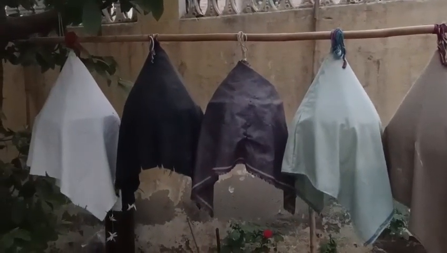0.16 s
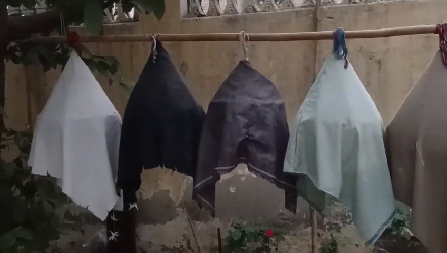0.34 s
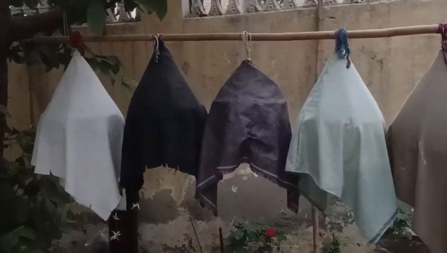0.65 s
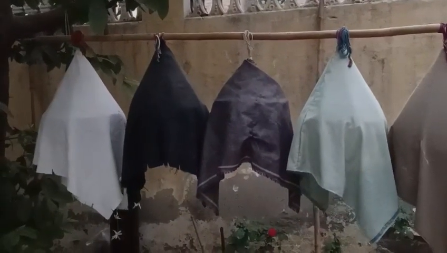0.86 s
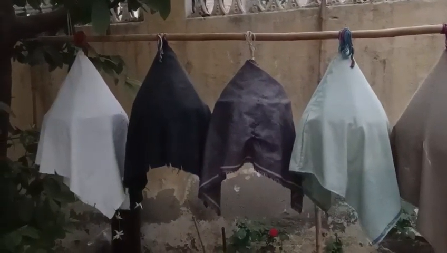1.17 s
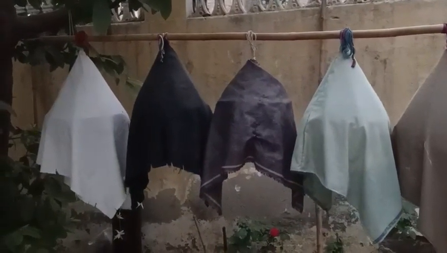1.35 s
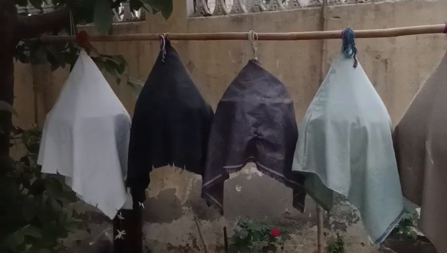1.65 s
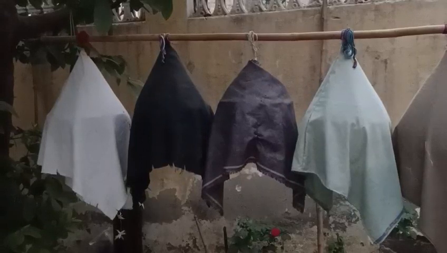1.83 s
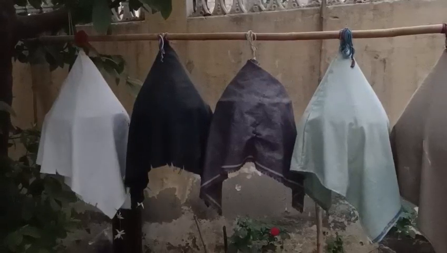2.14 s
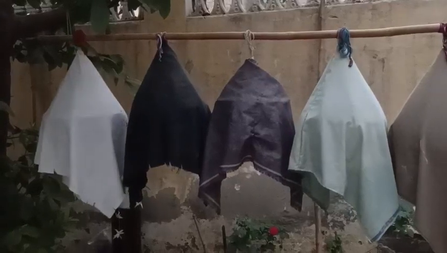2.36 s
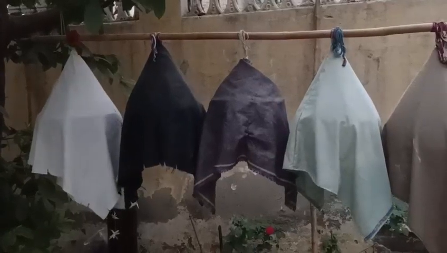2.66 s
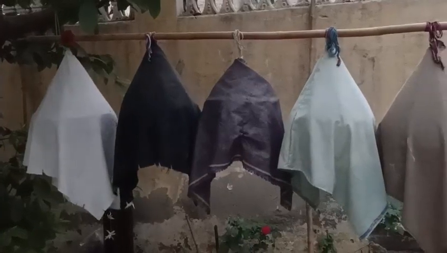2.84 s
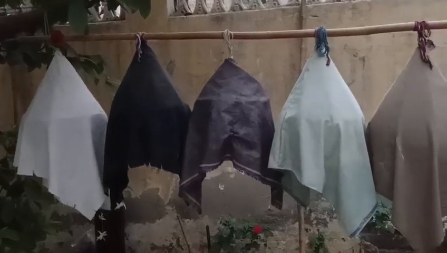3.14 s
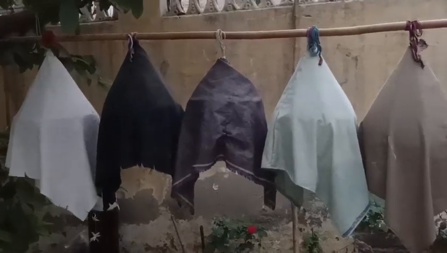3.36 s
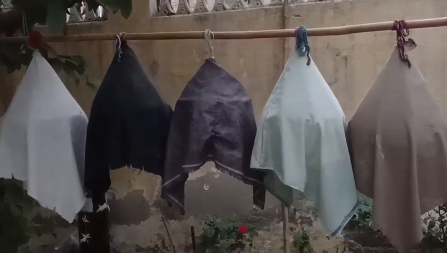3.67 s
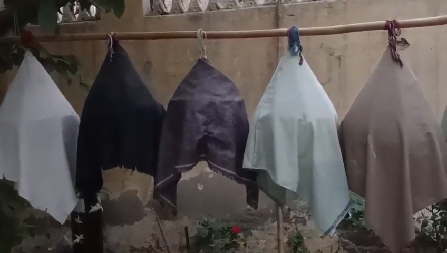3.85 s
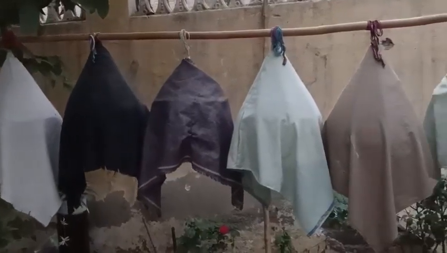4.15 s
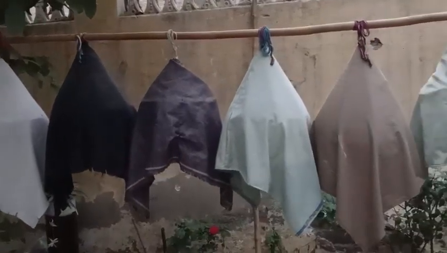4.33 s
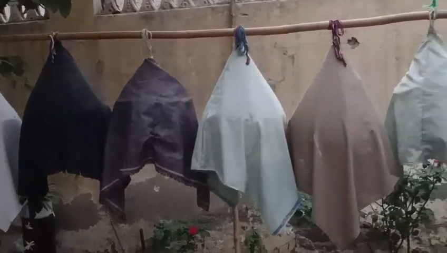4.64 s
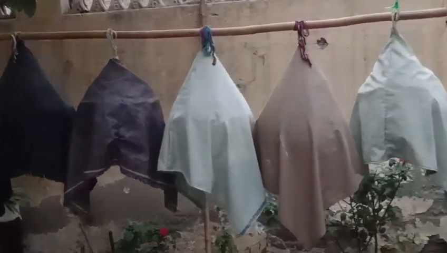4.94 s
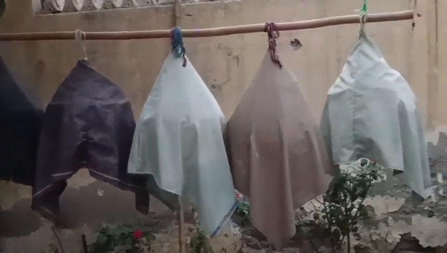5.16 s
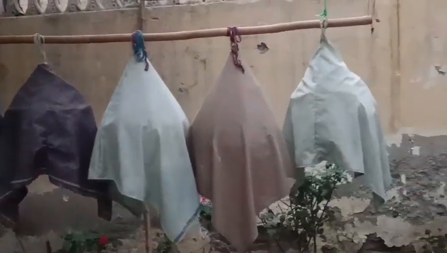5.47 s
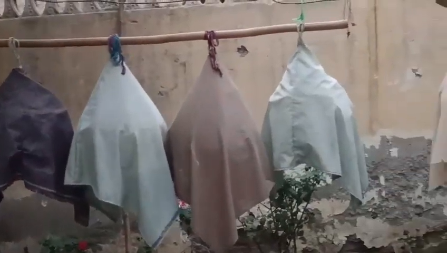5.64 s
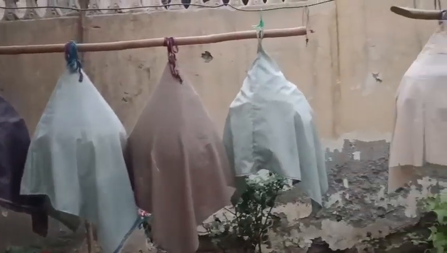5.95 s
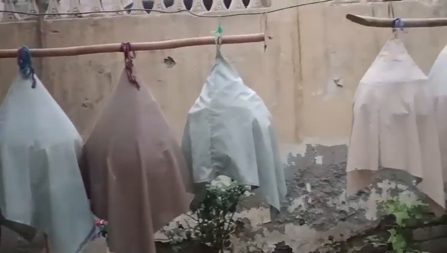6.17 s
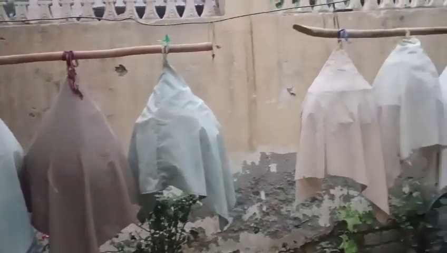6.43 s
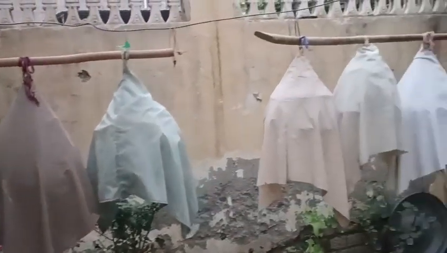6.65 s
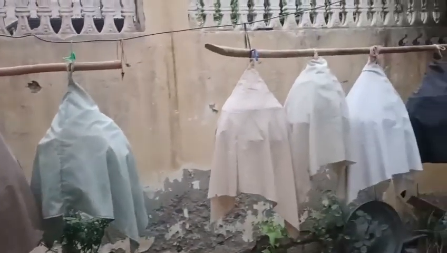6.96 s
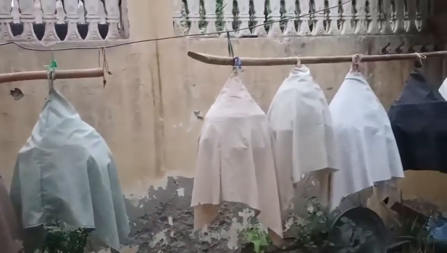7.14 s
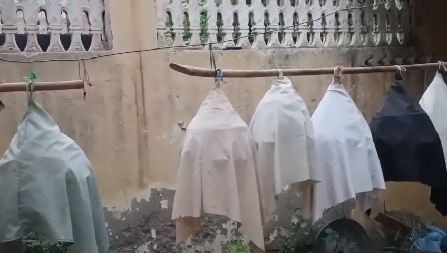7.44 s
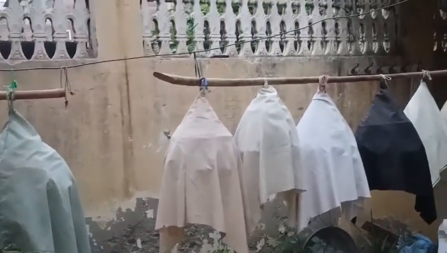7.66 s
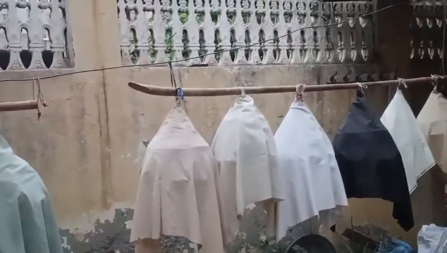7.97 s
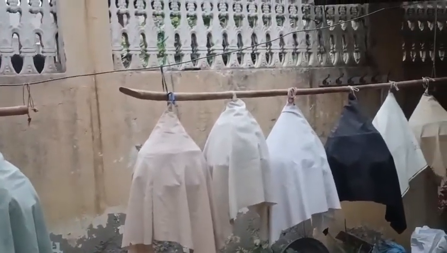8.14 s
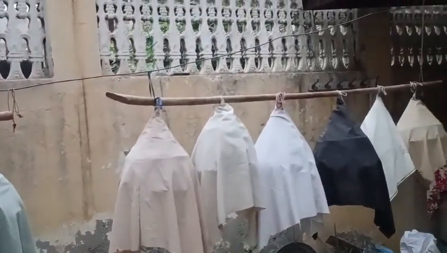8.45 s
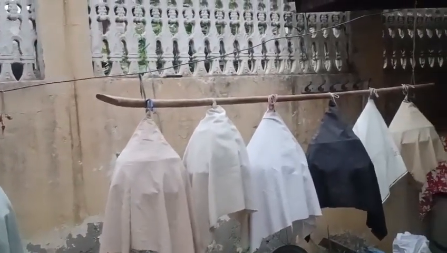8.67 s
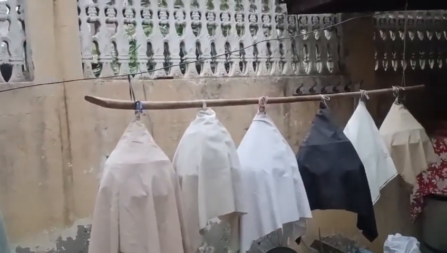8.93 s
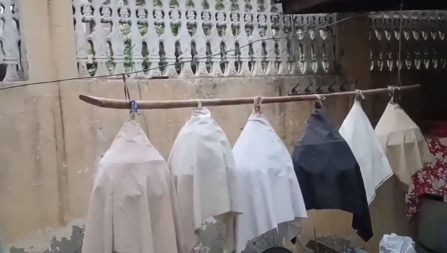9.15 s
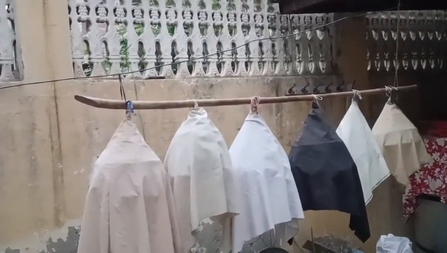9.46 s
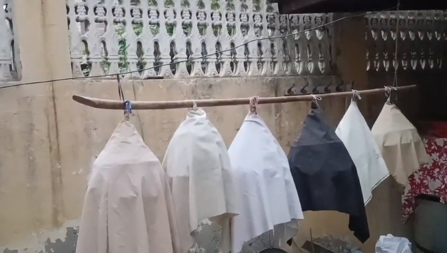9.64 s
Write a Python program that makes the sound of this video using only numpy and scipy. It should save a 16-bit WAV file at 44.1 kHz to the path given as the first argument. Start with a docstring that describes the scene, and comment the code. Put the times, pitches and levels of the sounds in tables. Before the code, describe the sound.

Bright, nearly pure quail whistles repeat in quick pairs against hard walls, over soft falling chirps, raspy bouts, faint hum, hiss and dull bumps.

```python
"""Caged quails in a small courtyard

Quails whistle in pairs from cloth-covered cages along a wall: each nearly pure tone sags, then flicks upward.
One bird gives three low whips and a growl of rough harmonics; others slur downward or rasp with noise bands.
Far off a rooster crows, its cry smeared by many echoes, over a faint hum, a low rumble with dull bumps, and hiss.
Delayed copies and a decaying noise tail make the walls answer every near note."""
import sys
import numpy as np
from scipy import signal
from scipy.fft import rfft, irfft
from scipy.io import wavfile

SR = 44100
rng = np.random.default_rng(int(sys.argv[2]) if len(sys.argv) > 2 else 0)


def transcribe(signal):
    """Save signal, clipped to [-1, 1], as a 16-bit WAV file at the path in sys.argv[1]."""
    frames = np.atleast_2d(signal).T
    limited = np.clip(frames, -1, 1)
    pcm = np.round(limited * 32767).astype(np.int16)
    wavfile.write(sys.argv[1], SR, pcm)


N = 432174
TIME = np.arange(N) / SR


def from_db(db):
    """Decibel law: amplitude ratio from a level."""
    return 10 ** (np.asarray(db) / 20)


def rms_one(x):
    """Power normalisation: scale to an effective value of one."""
    return x / np.sqrt(np.mean(x ** 2) + 1e-20)


def along(rows, at):
    """Linear interpolation of every column against the first."""
    first, *columns = np.transpose(rows)
    return [np.interp(at, first, column) for column in columns]


def at_hz(points, hz):
    """Interpolation of a level on a logarithmic frequency axis."""
    points_hz, points_db = np.array(points).T
    return np.interp(np.log(hz + 1), np.log(points_hz), points_db)


def add(out, start_s, sound):
    """Superposition: mix a stereo sound in at its time."""
    i = round(start_s * SR)
    a, b = max(i, 0), min(i + sound.shape[1], N)
    if b > a:
        out[:, a:b] += sound[:, a - i:b - i]


def drift(size, hz):
    """Low-passed noise: two equal poles smooth chance into a wander of spread 1."""
    pole = np.exp(-2 * np.pi * hz / SR)
    white = rng.standard_normal(size + SR // 10)
    return rms_one(signal.lfilter([1], [1, -2 * pole, pole * pole], white))[-size:]


def fade(t, rise, fall):
    """Amplitude envelope: quarter-sine start and stop, in seconds."""
    opening = np.sin(np.pi / 2 * np.clip((t - t[0]) / rise, 0, 1))
    closing = np.sin(np.pi / 2 * np.clip((t[-1] - t) / fall, 0, 1))
    return opening * closing


def phase_of(hz):
    """Phase is the running integral of frequency."""
    return 2 * np.pi * np.cumsum(hz) / SR


def coloured(spectrum, alike):
    """Spectral shaping: steady stereo noise, its left-right likeness set by the mid-side balance."""
    white = rfft(rng.standard_normal((2, N)))
    hz = np.arange(white.shape[1]) * SR / N
    mid, side = irfft(white * from_db(at_hz(spectrum, hz)), N)
    alike = np.clip(alike, 0, 1)
    return rms_one(np.sqrt(1 + alike) * mid + np.sqrt(1 - alike) * side * [[1], [-1]])


# Reverberation time of the yard by frequency: centre_hz, t60_s
YARD_T60 = [(300, 0.55), (2000, 0.36), (3200, 0.45), (5500, 0.38), (7300, .38), (11000, 0.44),
            (16000, 0.14)]


def yard_tail(build_s=0.0035):
    """Diffuse reverberation: noise decays exponentially at a rate set by frequency; energy near 1 a side."""
    t = np.arange(int(.7 * SR)) / SR
    white = rfft(rng.standard_normal((2, len(t))))
    hz = np.arange(white.shape[1]) * SR / len(t)
    centres_hz = [row[0] for row in YARD_T60]
    tail = 0
    for k, (_, t60_s) in enumerate(YARD_T60):
        band = np.interp(hz, centres_hz, np.arange(len(YARD_T60)) == k)
        tail = tail + irfft(white * band, len(t)) * from_db(-60 * t / t60_s)
    onset = 1 - np.exp(-t / build_s)
    reference_decay = from_db(-60 * t / YARD_T60[2][1])
    return tail * onset / np.linalg.norm(onset * reference_decay)


# First wall reflections: delay_s (before a random spread), relative_level_db
WALLS = [(.0044, 0), (0.009, -5), (0.0181, -15), (.029, -14)]


def yard_paths(pan_db, lead_s, wet_db, walls_db):
    """Impulse response: direct sound, wall echoes and tail; the paths differ from call to call."""
    paths = from_db(wet_db) * yard_tail()
    # a positive lead brings the sound to the left ear first
    paths[0, round(max(-lead_s, 0) * SR)] += from_db(pan_db / 2)
    paths[1, round(max(lead_s, 0) * SR)] += from_db(-pan_db / 2)
    for delay_s, db in WALLS:
        lags_s = delay_s * rng.uniform(.9, 1.1) + rng.uniform(0, .0004, 2)
        paths[[0, 1], (lags_s * SR).astype(int)] += from_db(db + walls_db)
    return paths


def yard(sound, pan_db, wet_db):
    """Convolution with the yard: the direct sound reaches both ears at once, then its echoes."""
    return signal.fftconvolve(sound[None], yard_paths(pan_db, 0, wet_db, walls_db=0.5), axes=1)


# Spectra of the low air noise and of the high hiss: frequency_hz, relative_density_db
AIR = [(18, -56.5), (30, -26), (151, -0.5), (242, -6.5), (298, -5), (662, -15), (986, -18.5), (1440, -16),
       (1950, -12), (2800, -20), (3640, -49.5), (6160, -120)]
HISS = [(1500, -20), (2600, -12), (3300, -2), (4500, -21), (5250, -8), (5900, -21), (6600, -3),
        (7700, -4.5), (8900, -21.5), (10100, -5.5), (11500, -20), (15500, -35.5)]
AIR_DB, HISS_DB = -78.5, -74.5


def air_and_hiss():
    """Broadband noise: partly shared air in the two ears and a fully shared high hiss."""
    return from_db(AIR_DB) * coloured(AIR, alike=0.76) + from_db(HISS_DB) * coloured(HISS, alike=1.0)


# Spectrum of a narrow noise band near 5.2 kHz: frequency_hz, relative_density_db
SIZZLE = [(4700, -58.5), (5050, -5), (5250, -1.5), (5450, -0.5), (5750, -57.5)]
# Its changing level: time_s, level_db
SIZZLE_DB = [(0, -76), (.9, -70), (2.1, -75), (4.0, -72.5), (6.1, -88), (7.1, -70), (9.7, -73.5)]


def sizzle():
    """Amplitude-modulated narrow-band noise."""
    [level_db] = along(SIZZLE_DB, TIME)
    return from_db(level_db) * coloured(SIZZLE, alike=0.38)


# Spectrum of the rumble: frequency_hz, relative_density_db
RUMBLE = [(50, -22.5), (90, -10), (125, -4), (150, 6.5), (175, -11), (230, -15.5), (400, -36.5),
          (1500, -89.5)]
# Rumble between the bumps: time_s, level_db
RUMBLE_DB = [(0.0, -87), (0.57, -81), (9.08, -88.5), (9.7, -84)]
# Dull low bumps: peak_s, level_db
BUMPS = [(1.0, -66.5), (1.19, -72), (1.471, -58.5), (1.85, -65.5), (1.93, -58.5), (2.12, -63.5),
         (2.23, -68), (3.24, -62.5), (3.38, -58.5), (3.94, -62), (4.21, -56.5), (5.63, -66.5), (6.03, -68),
         (6.98, -76), (9.53, -71.5)]
BUMP_RISE_S, BUMP_FALL_S = 0.027, 0.024


def rumble():
    """Low-frequency noise whose slowly changing power adds to that of rounded bumps."""
    [floor_db] = along(RUMBLE_DB, TIME)
    bumps = 0
    for peak_s, db in BUMPS:
        distance = np.maximum((peak_s - TIME) / BUMP_RISE_S, (TIME - peak_s) / BUMP_FALL_S)
        bumps = bumps + from_db(db) * np.exp(-distance ** 2)
    return np.hypot(from_db(floor_db), bumps) * coloured(RUMBLE, alike=.9)


# Brief swells of the hum: peak_s, half_width_s, rise_db
HUM_SWELLS = [(6.97, 0.036, 8), (7.98, 0.084, 12), (8.551, .07, 11), (9.501, 0.25, 11.5)]
# Rough noise round the hum: frequency_hz, relative_density_db
HUM_HALO = [(150, -40.5), (230, -9.5), (300, 0.5), (390, -4), (470, -22), (900, -45.5)]
HUM_HZ = 300
# level before and after the walk toward it, and the walk's start and end
HUM_FAR_DB, HUM_NEAR_DB, APPROACH_S = -85, -76, (4.7, 6.6)


def hum(waver_hz=3, flutter_db=2, halo_db=-7):
    """Modulated tone of a far motor: pitch and strength waver, and a noise halo swells with it."""
    db = np.interp(TIME, APPROACH_S, [HUM_FAR_DB, HUM_NEAR_DB])
    for peak_s, half_width_s, rise_db in HUM_SWELLS:
        db = db + rise_db * np.exp(-((TIME - peak_s) / half_width_s) ** 2)
    tone = np.sin(phase_of(HUM_HZ + waver_hz * drift(N, 20)))
    tone = tone * from_db(flutter_db * drift(N, 7.4))
    halo = from_db(halo_db) * coloured(HUM_HALO, alike=0.45)
    return from_db(db) * (tone + halo)


def background():
    """Superposition of noises: air, hiss, a narrow 5.2 kHz band of changing level, rumble and hum."""
    return air_and_hiss() + sizzle() + rumble() + hum()


# Weak overtones of a whistle: multiple, relative_level_db (each kind of note shifts it)
OVERTONES = [(2, -30.5), (3, -46), (4, -57)]


def whistle(hz, jitter, overtone_db, top_hz=14000):
    """Harmonic series: a nearly pure, trembling tone; the cloth low-passes its weak overtones."""
    phase = phase_of(hz * (1 + jitter * drift(len(hz), 210)))
    tone = np.sin(phase)
    for k, db in OVERTONES:
        cloth_loss = 1 + (k * hz / top_hz) ** 10
        tone = tone + from_db(db + overtone_db) * np.sin(round(k) * phase) / cloth_loss
    return tone


# Whistles, a long lead and a short answer to a pair:
# start_s, end_s, lowest_hz, top_hz, relative_level_db, left_minus_right_db, left_ear_lead_s
LEAD_NOTES = [(.953, 1.043, 3136, 7150, -18, 0.5, 0.0015), (2.340, 2.431, 3128, 7100, -16, 3.5, 2e-5),
              (3.713, 3.803, 3149, 7160, -16.5, 5, -0.0012), (4.954, 5.037, 2980, 5710, -29, -0.5, -0.0015),
              (5.054, 5.147, 3176, 7270, -16.5, 4, -14e-5), (6.166, 6.253, 3031, 5640, -20, 0, -0.0018),
              (6.424, 6.516, 3172, 7260, -17, -5, 5e-5), (7.379, 7.462, 3070, 5820, -16.5, 1, 0.0047),
              (8.578, 8.660, 3077, 5855, -17, -4, 2e-5), (9.774, 9.860, 3139, 6100, -22.5, -7, 0.0018)]
ANSWER_NOTES = [(-.240, -.175, 3067, 6180, -12.5, -1, 0.00098),
                (1.198, 1.262, 3067, 7150, -17, 0.5, 0.0026), (2.582, 2.648, 3078, 7110, -16, 3, 2e-5),
                (3.954, 4.020, 3119, 7130, -16.5, 7, 0.0022), (5.203, 5.249, 2960, 5600, -24.5, -3, 0.0037),
                (5.302, 5.365, 3120, 7190, -15.5, 0.5, -16e-5), (6.415, 6.467, 3019, 6070, -20, 0, -14e-5),
                (6.667, 6.735, 3121, 7210, -16, -7, 0), (7.612, 7.674, 3035, 6090, -15, 1, 0.0044),
                (8.811, 8.872, 3036, 6260, -15.5, -2, 0)]
# Shape of each kind before the flick: share_of_note, pitch_ratio_to_lowest, relative_level_db
LEAD_SHAPE = [(0, 1.11, -10), (.2, 1.056, -5), (.34, 1.024, 0), (.48, 1.0, 1), (.62, 1.004, 1),
              (.76, 1.014, -1), (.88, 1.02, -3), (1, 1.02, -4)]
ANSWER_SHAPE = [(0, 1.03, -2), (.1, 1.008, 0), (.22, 1.0, 1), (.4, 1.011, 1), (.55, 1.023, 1),
                (.7, 1.03, -2), (.85, 1.035, -3), (1, 1.035, -4)]
# Strength of a whistle by its pitch: pitch_hz, relative_level_db
REGISTER = [(3100, 4.5), (3600, 0), (4400, -10.5), (5400, -6.5), (5900, -9.5), (6500, -19.5), (7300, -10)]
WHISTLE_WET_DB = -7.5
HELD_DB = -1.5   # the held pitch against the flick


def calls(notes, shape, rise_s, flick_s=0.0061, hold_s=0.0046, soft_db=-5, strain_db=9, flick_wet_db=6.5):
    """Exponential glide: pitch sags, shoots up with growing overtones, and rests an instant on top."""
    out = np.zeros((2, N))
    for start_s, end_s, low_hz, top_hz, db, pan_db, lead_s in notes:
        t = np.arange(int((end_s - start_s) * SR)) / SR
        bend, shape_db = along(shape, t / t[-1])
        flick = np.exp(np.minimum(t - t[-1] + hold_s, 0) / flick_s)
        hz = low_hz * bend * (1 - flick) + top_hz * flick
        note = whistle(hz, jitter=0.0024 + 0.0041 * flick, overtone_db=soft_db + strain_db * flick)
        note = note * from_db(shape_db + at_hz(REGISTER, hz)) * fade(t, rise=rise_s, fall=0.003)
        held_share = np.clip(1 - 5 * flick, 0, 1)
        paths = yard_paths(pan_db, lead_s, WHISTLE_WET_DB, walls_db=-7)
        held = signal.fftconvolve([note * held_share], paths, axes=1)
        # echoes swell or cancel a held pitch by chance, so it is set to its level at each ear
        ear_db = HELD_DB + np.array([[pan_db], [-pan_db]]) / 2
        held = held / held[:, :len(t)].std(axis=1, keepdims=True) * from_db(ear_db)
        # the high flick is beamed at the walls and arrives mostly as echo
        flicked = yard(note * (1 - held_share), 0, flick_wet_db)
        add(out, start_s, from_db(db) * (held + flicked))
    return out


# Low whips: start_s, end_s, relative_level_db, left_minus_right_db
WHIPS = [(0.305, 0.33, -19, 1.5), (0.449, 0.483, -17, -1), (0.571, 0.603, -18.5, -5)]
# Their common glide: time_before_end_s, pitch_hz, relative_level_db
WHIP_SHAPE = [(0, 4500, -14.5), (.003, 3540, 1), (.006, 2500, 2), (.009, 2200, 3), (.014, 2000, -2),
              (.019, 1780, -11), (.026, 1450, -24.5), (.037, 1420, -15)]
WHIP_TOP_HZ = 4500   # where the whips stop


def whips(rasp_db=-39):
    """Rapid upward glide to a low-pass ceiling, with a little rush of modulated air on top."""
    out = np.zeros((2, N))
    ceiling = signal.butter(14, WHIP_TOP_HZ, fs=SR, output="sos")
    for start_s, end_s, db, pan_db in WHIPS:
        t = np.arange(int((end_s - start_s) * SR)) / SR
        hz, shape_db = along(WHIP_SHAPE, t[-1] - t)
        level = from_db(db + shape_db) * fade(t, rise=0.0038, fall=.001)
        rush = from_db(rasp_db) * drift(len(t), 700) * np.sin(2 * np.pi * 7800 * t)
        tone = whistle(hz, jitter=.005, overtone_db=-6.5) * level
        note = signal.sosfilt(ceiling, yard(tone, pan_db, wet_db=0.5))
        add(out, start_s, note + yard(rush * level, pan_db, wet_db=1.0))
    return out


def throaty(syllables, throat, jitter, wet_db, count=8):
    """Source and filter: unsteady harmonics weighted by the resonances of a throat."""
    out = np.zeros((2, N))
    for rows in syllables:
        t = np.arange(rows[0][0], rows[-1][0], 1 / SR)
        hz, db = along(rows, t)
        phase = phase_of(hz * (1 + jitter * drift(len(t), 120)))
        harmonics = [from_db(at_hz(throat, k * hz)) * np.sin(k * phase) for k in range(1, count + 1)]
        cry = rms_one(sum(harmonics)) * from_db(db) * fade(t, rise=0.0065, fall=.008)
        # direct sound and tail together keep the level
        add(out, t[0], yard(cry, 0, wet_db) / np.hypot(1, from_db(wet_db)))
    return out


# One growl: time_s, pitch_hz, level_db
GROWL = [(.493, 865, -48), (.502, 621, -33.5), (.52, 528.6, -44.5), (.545, 530, -32.5), (.565, 557, -37),
         (.58, 580, -37), (.59, 607, -67)]
# Its throat: frequency_hz, relative_gain_db
GROWL_THROAT = [(450, -21.5), (800, -7.5), (1100, 3), (1600, 5), (2200, 11.5), (3000, 4), (5000, -29)]


def growl():
    """Frequency jitter roughens the harmonics of a low cry."""
    return throaty([GROWL], GROWL_THROAT, jitter=.07, wet_db=-10)


# Soft falling notes: start_s, length_s, from_hz, to_hz, relative_level_db
SLURS = [(0.545, 0.018, 2292, 1349, -36.5), (1.543, 0.051, 1704, 1408, -70),
         (1.761, 0.068, 3900, 3524, -66.5), (4.55, 0.059, 4000, 2820, -55.5),
         (4.735, 0.036, 4140, 2750, -55), (5.7, 0.07, 3996, 2700, -58.5), (5.892, 0.048, 3900, 2660, -59),
         (6.313, 0.038, 2620, 2070, -55.5), (7.685, 0.1, 2913, 2045, -62), (8.204, 0.078, 3820, 3450, -59),
         (8.232, 0.093, 3410, 2185, -60)]


def slurs():
    """Geometric glide: quiet, unsteady notes fall by equal ratios in equal times."""
    out = np.zeros((2, N))
    for start_s, length_s, from_hz, to_hz, db in SLURS:
        t = np.arange(int(length_s * SR)) / SR
        note = whistle(np.geomspace(from_hz, to_hz, len(t)), jitter=0.032, overtone_db=9.0)
        note = note * fade(t, rise=0.0066, fall=0.002)
        add(out, start_s, yard(from_db(db - 3) * note, 0, wet_db=0.5))
    return out


def far_away(sound, t60=0.39):
    """Multiple scattering: heard only by way of many roofs and walls, which smear it and make it waver."""
    t = np.arange(SR) / SR
    shared, separate = rng.standard_normal(SR), rng.standard_normal((2, SR))
    scatter = (shared + .5 * separate) * from_db(-60 * t / t60)
    heard = signal.fftconvolve(sound, scatter / np.linalg.norm(scatter[0]), axes=1)[:, :N]
    return heard * from_db(2 * drift(N, 9))


# The far crow, one list for each syllable: time_s, pitch_hz, level_db (before the far echoes)
CROW = [
    [(2.22, 511, -68), (2.28, 548, -78.5), (2.31, 702, -54), (2.35, 680, -83.5)],
    [(2.43, 628, -63), (2.47, 576, -54.5), (2.54, 520, -71.5), (2.57, 520, -103)],
    [(2.65, 539, -72), (2.69, 525, -76.5), (2.74, 819, -63), (2.81, 712, -66.5), (2.88, 602, -87)],
    [(2.92, 878, -75.5), (2.98, 901, -58), (3.13, 899, -59), (3.24, 847, -66.5), (3.33, 849, -64),
     (3.40, 777, -95.5)],
    [(3.46, 834, -73.5), (3.57, 804.5, -61), (3.69, 783, -73), (3.84, 748, -72), (3.95, 736, -83.5)],
]
# Throat with the bill half open, then in the later syllables: frequency_hz, relative_gain_db
CROW_HALF_OPEN = [(500, 3.5), (750, -8), (1200, -15), (1700, -17.5), (3000, -25)]
CROW_THROAT = [(500, 6), (900, -9), (1200, -3.5), (1700, -2), (2400, -15), (3500, -31)]


def rooster():
    """Vocal resonance: the bill is half open in the first three syllables; the last two have another throat."""
    opening = throaty(CROW[:3], CROW_HALF_OPEN, jitter=0.033, wet_db=8.5)
    held = throaty(CROW[3:], CROW_THROAT, jitter=.04, wet_db=0)
    return far_away(opening + held)


# Bouts of nearly evenly spaced hoarse notes:
# first_start_s, last_start_s, nominal_spacing_s, note_length_s, level_db, lowest_resonance_hz
RASP_BOUTS = [(3.011, 3.27, .16, 0.08, -64.5, 1530), (3.536, 3.67, .16, 0.1, -59.5, 1537),
              (4.517, 4.65, .16, 0.092, -53.5, 1523), (5.283, 5.61, .16, 0.095, -59, 1507),
              (5.669, 5.79, .15, 0.11, -55.5, 1613), (6.276, 6.286, .16, 0.062, -54.5, 1680),
              (6.819, 7.275, .113, .087, -59, 1433), (8.247, 8.48, .093, 0.064, -55.5, 1533),
              (9.157, 10.2, .094, 0.056, -56.5, 1594)]
# Throat resonances: multiple_of_lowest, nominal_width_hz, relative_level_db
RASP_MODES = [(1, 110.4, -5), (1.24, 131, -10), (2.249, 351, 3), (2.602, 303, -9), (3.201, 685, 2.5),
              (4.2, 1156, -4), (7.0, 2506, -14)]
BOUT_SWELL_DB, ACCENT_DB = 2, 0.5   # a bout is loudest in its middle; its notes differ by chance


def rasps(sag=0.25, stray_s=.004):
    """Turbulence in resonances: narrow noise bands, which sink as the bill closes."""
    out = np.zeros((2, N))
    for first_s, last_s, spacing_s, length_s, db, hz in RASP_BOUTS:
        t = np.arange(int(length_s * SR)) / SR
        phase = phase_of(hz * (1 + sag * (.5 - t / length_s)))
        count = round(abs(last_s - first_s) / spacing_s) + 1
        for share in np.linspace(0, 1, count):
            note = 0
            for k, width_hz, mode_db in RASP_MODES:
                # two independent wanders in quadrature make one noise band
                in_phase = drift(len(t), width_hz / 2) * np.cos(k * phase)
                quadrature = drift(len(t), width_hz / 2) * np.sin(k * phase)
                note = note + from_db(mode_db) * (in_phase + quadrature)
            effort_db = BOUT_SWELL_DB * (np.sin(np.pi * share) - 1) + ACCENT_DB * rng.standard_normal()
            note = from_db(db + effort_db) * rms_one(note) * fade(t, rise=0.038, fall=0.063)
            start_s = first_s + share * (last_s - first_s) + stray_s * rng.standard_normal()
            add(out, start_s, yard(note, 0, wet_db=4.5))
    return out


def scene():
    """Superposition of the background noises, the near quails and the far rooster."""
    leads = calls(LEAD_NOTES, LEAD_SHAPE, rise_s=0.014)
    answers = calls(ANSWER_NOTES, ANSWER_SHAPE, rise_s=0.0065)
    quails = leads + answers + whips() + growl() + slurs() + rasps()
    return background() + quails + rooster()


CUTOFF_HZ = 15800


def record(dry):
    """Band limiting: a steep elliptic low-pass cuts the top."""
    return signal.sosfilt(signal.ellip(10, .2, 80, CUTOFF_HZ, fs=SR, output="sos"), dry)


dry = scene()
out = record(dry)
transcribe(out)
```